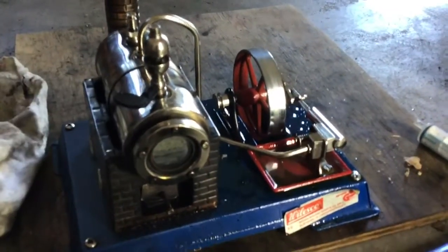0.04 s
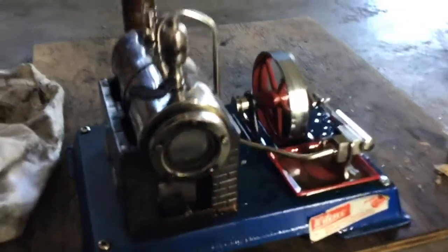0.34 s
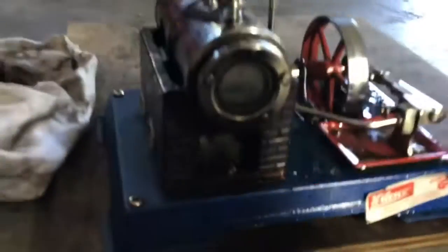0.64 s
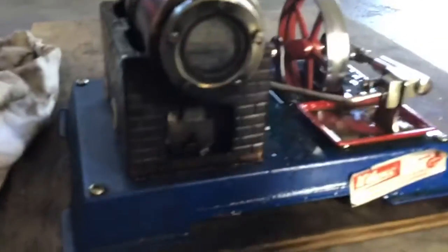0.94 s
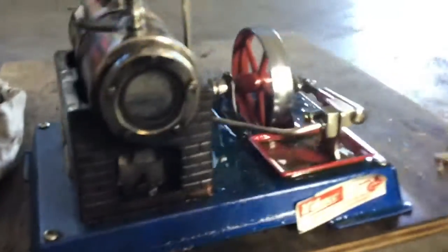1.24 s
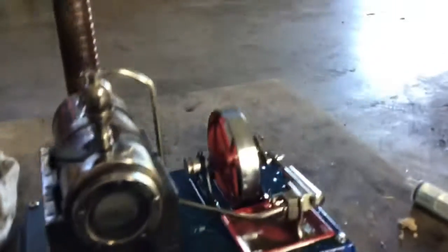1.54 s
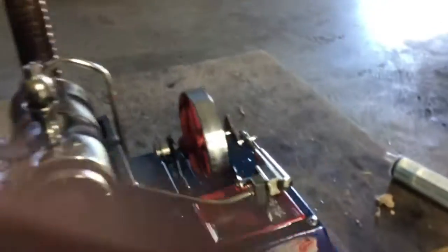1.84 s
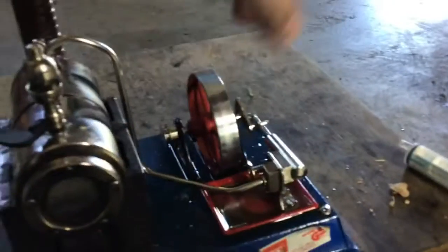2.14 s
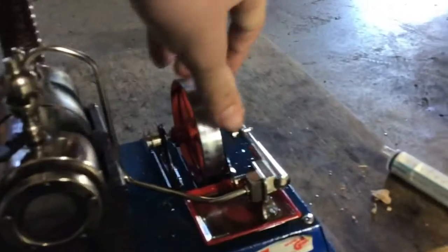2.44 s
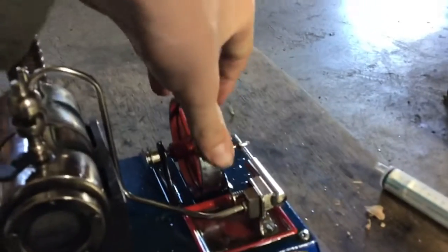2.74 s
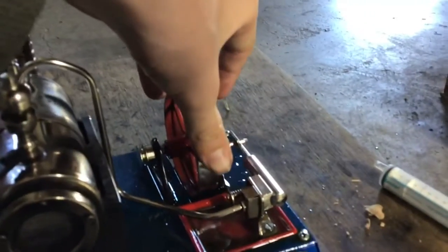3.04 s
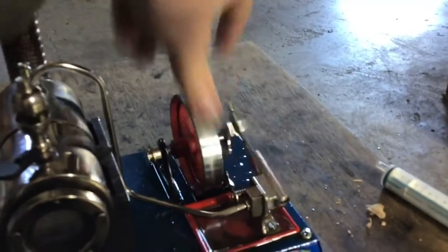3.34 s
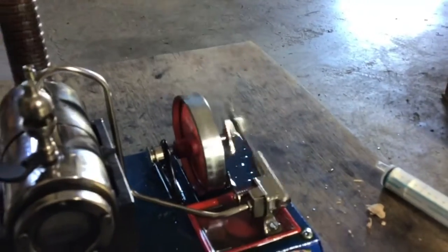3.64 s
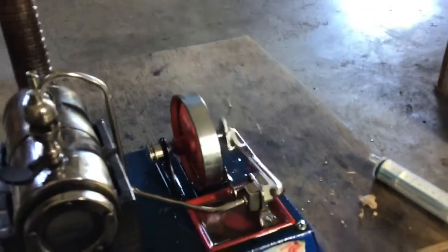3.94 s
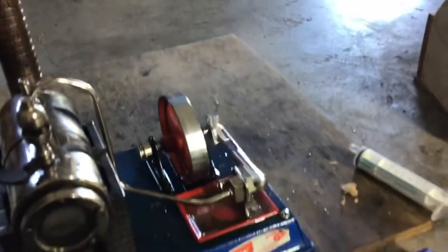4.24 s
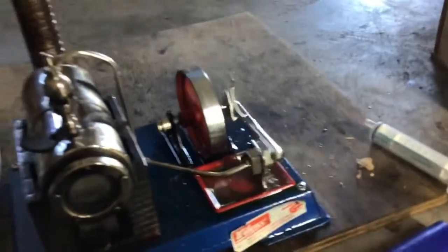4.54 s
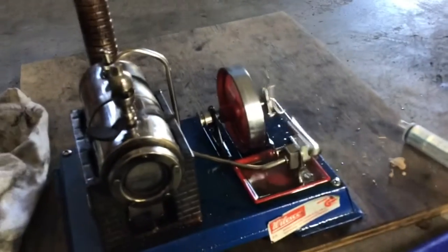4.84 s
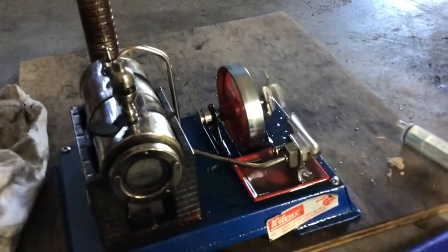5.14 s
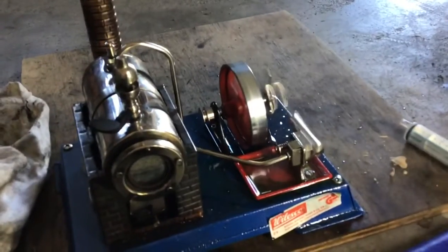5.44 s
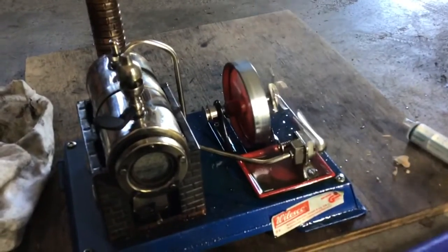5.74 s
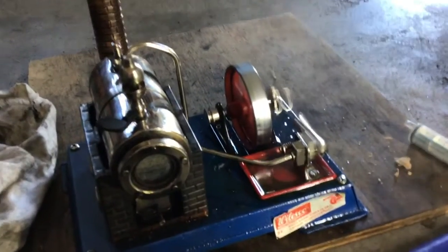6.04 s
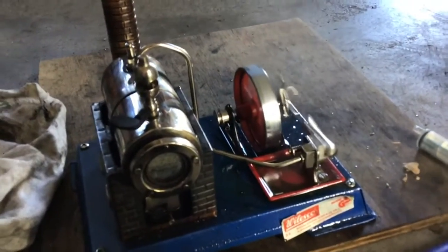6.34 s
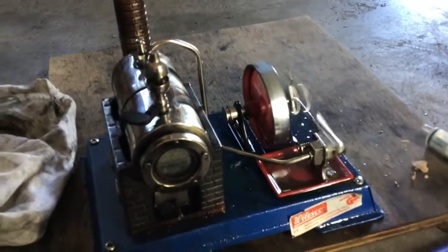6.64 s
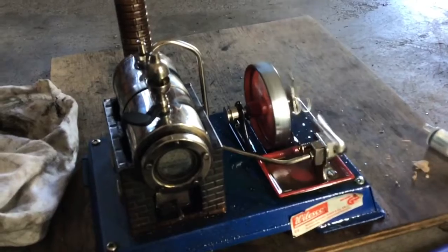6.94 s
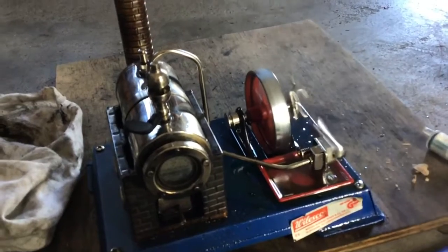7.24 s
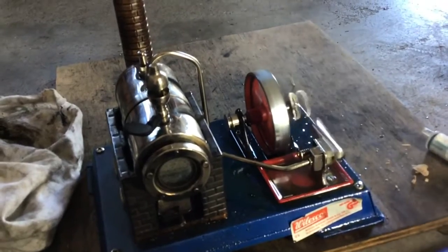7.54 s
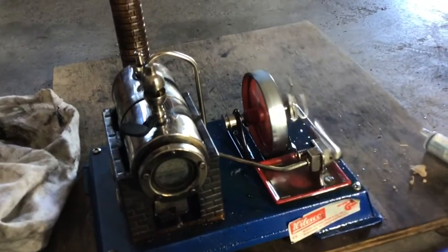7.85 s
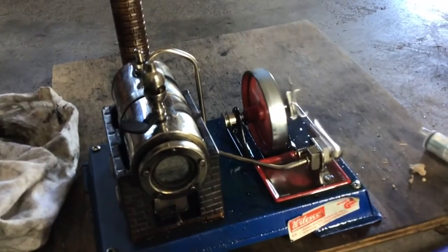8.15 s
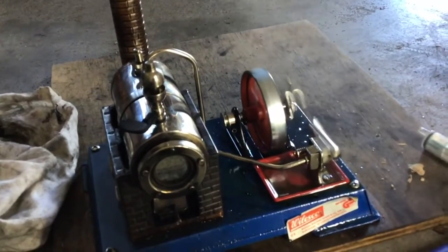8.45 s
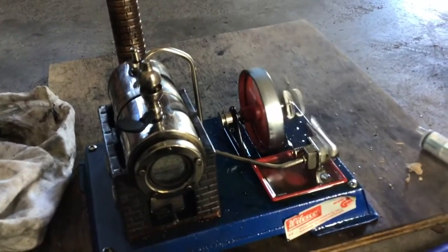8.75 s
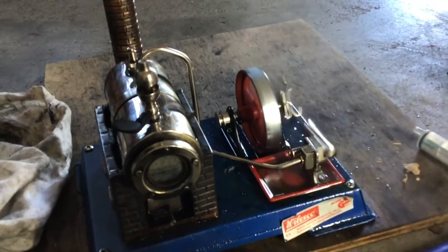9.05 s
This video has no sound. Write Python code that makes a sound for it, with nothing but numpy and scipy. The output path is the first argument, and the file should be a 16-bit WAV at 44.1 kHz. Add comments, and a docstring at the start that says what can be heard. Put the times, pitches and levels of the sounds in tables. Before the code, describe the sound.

A small steam engine hisses faintly amid microphone bumps, then starts with a few clanks and speeds up into rapid chuffing and tinny rattling.

```python
"""Toy steam engine on a workbench

Steam hisses and spits past the piston while a hand shifts a camera, bumping and rubbing its case.
The flywheel is pushed and the engine runs up to 32 turns a second, squeaking on the way.
On every turn the slack crank knocks the tin base plate, the swinging masses make it hum,
and the cylinder lets out two puffs of steam."""
import sys
import numpy as np
from scipy import signal
from scipy.fft import rfft, irfft, next_fast_len
from scipy.io import wavfile
from scipy.ndimage import uniform_filter1d, map_coordinates

SR = 44100
rng = np.random.default_rng(int(sys.argv[2]) if len(sys.argv) > 2 else 0)


def wav_out(sig):
    """Save sig, one row per channel (or a flat mono array), as 16-bit PCM at SR to the path in sys.argv[1]."""
    wavfile.write(sys.argv[1], SR, np.round(np.clip(np.atleast_2d(sig).T, -1, 1) * 32767).astype(np.int16))


N = 400428
TIME = np.arange(N) / SR


def amp(db):
    """Decibels to gain."""
    return 10 ** (np.asarray(db) / 20)


def unit(x):
    """Scale to rms 1."""
    return x / np.sqrt(np.mean(x ** 2) + 1e-20)


def along(points, hz):
    """Read a curve of (Hz, value) points on a log frequency axis."""
    freqs, values = np.transpose(points)
    return np.interp(np.log(hz + 1), np.log(freqs + 1), values)


def curves(rows):
    """One envelope for each column after the time."""
    times, *columns = np.transpose(rows)
    return [np.interp(TIME, times, column) for column in columns]


def wobble(rate):
    """A smooth random curve, rate knots a second."""
    return map_coordinates(rng.standard_normal(int(N * rate / SR) + 4), [TIME * rate])


def swell(start, end, rise, fall):
    """A smooth attack, a hold and a release, all in seconds."""
    ramp = np.clip(np.minimum((TIME - start) / rise, (end - TIME) / fall), 0, 1)
    return np.sin(np.pi / 2 * ramp) ** 2


def filtered(x, response):
    """Apply a gain that depends on frequency."""
    size = next_fast_len(N + SR // 2)
    return irfft(rfft(x, size) * response(np.fft.rfftfreq(size, 1 / SR)), size)[:N]


def low_cut(x, edge_hz):
    """Roll off the lows at 18 dB an octave."""
    return filtered(x, lambda hz: hz ** 3 / np.hypot(hz ** 3, edge_hz ** 3))


def eq(x, spectrum):
    """Colour x with a curve of (Hz, dB) points."""
    return filtered(x, lambda hz: amp(along(spectrum, hz)))


def noise(spectrum):
    """Noise of rms 1, coloured by (Hz, dB) points."""
    return unit(eq(rng.standard_normal(N), spectrum))


def ring(x, modes):
    """Play x through a body of damped modes whose response has unit energy."""
    t = np.arange(SR // 5) / SR
    body = sum((-1) ** k * amp(db) * width * np.exp(-np.pi * width * t) * np.sin(2 * np.pi * hz * t)
               for k, (hz, width, db) in enumerate(modes))
    return signal.fftconvolve(x, body / np.linalg.norm(body))[:N]


def add(track, start, sound):
    """Mix a sound in at a start time in seconds."""
    part = track[round(start * SR):][:len(sound)]
    part += sound[:len(part)]


def chirp(hz, growth, t60, rise_cycles=2.15):
    """A dying note that falls in pitch as its period grows steadily."""
    t = np.arange(SR // 4) / SR
    cycles = np.log1p(growth * hz * t) / growth
    attack = 1 - np.exp(-(t * hz / rise_cycles) ** 2)
    return amp(-60 * t / t60) * attack * np.sin(2 * np.pi * cycles)


# The room's decay. Each row: frequency in Hz, t60 in seconds.
ROOM_DECAY = [(100, 0.51), (1000, 0.25), (4000, 0.22), (14000, 0.36)]

def surroundings(x):
    """Bench and walls answer with a short, dense tail, 2 ms late."""
    hz, t, spectra = signal.stft(rng.standard_normal(SR // 3), SR, nperseg=256)
    tail = signal.istft(spectra * amp(-60 * t / along(ROOM_DECAY, hz)[:, None]), SR, nperseg=256)[1]
    return signal.fftconvolve(x, np.pad(tail, (SR // 500, 0)) / np.linalg.norm(tail))[:N]


# The sleeve's bright swish. Each row: frequency in Hz, relative level in dB.
SWISH_EQ = [(2000, -25), (4300, -11), (5400, 7), (6400, -4), (8000, -20), (15000, -35)]
SWING_END_S = 1.824

def sleeve(swing):
    """Cloth rustles louder as the camera swings round, and swishes near the end."""
    cloth = noise([(500, -5), (1500, 16), (3000, 5), (5500, 6), (8000, -2), (15000, -21.5)])
    time_left = np.maximum(SWING_END_S - TIME, 0)
    rustle = swing * amp(-55 - 16 * time_left + 2 * wobble(rate=25)) * cloth
    swish = amp(-58.5) * swell(1.44, 1.74, rise=.22, fall=.1618) * noise(SWISH_EQ)
    return rustle + swish


# Bumps on the case. Each row: start in seconds, level in dB, first pitch in Hz,
# growth of the period in seconds per second, t60 in seconds.
CASE_BUMPS = [(0.477, -0.5, 1510, 0.49, 0.086), (.844, -23, 1530, 0.36, 0.073),
              (1.162, -32.5, 936, 0.2326, 0.06), (1.198, -24, 520, 0.4424, 0.05594),
              (1.245, -23, 480, 0.31, .05), (1.258, -19, 700, 0.29, 0.028),
              (1.274, -23.5, 1050, 0.18244, 0.0578), (1.477, -12.5, 966.3, 0.372, 0.082),
              (1.7, -23, 905, 0.59, 0.1007), (1.742, -20, 1140, 0.52, 0.11), (2.022, -27, 200, 0.32, 0.14),
              (3.919, -20, 427, 0.225, .09), (3.931, 3.5, 161, 0.27, 0.11),
              (3.964, -7.5, 215, 0.055, 0.079), (4.39, -15.5, 328, 0.42, 0.094)]

def case_bumps():
    """Bumps bend the case, whose high notes arrive first; gives the notes and a skin-scuff envelope."""
    notes, scuff = np.zeros((2, N))
    t = np.arange(SR // 10) / SR
    for start, db, hz, growth, t60 in CASE_BUMPS:
        edge = amp(-18) * chirp(1.8 * hz, growth=.112, t60=.014)
        add(notes, start, amp(db) * (chirp(hz, growth, t60) + edge))
        add(scuff, start, amp(db - 25.5 - 60 * t / .07))
    return notes, scuff


# Skin dragging over the case. Each row: start and length in seconds, then rumble, rub and scratch in dB.
SKIN_DRAGS = [(0.262, 0.18, -71, -75, -84), (0.436, 0.048, -29.5, -33.5, -63),
              (0.577, 0.026, -49, -51, -52), (0.84, .02, -62, -44, -54), (0.957, 0.15, -67, -58, -71),
              (1.266, 0.0455, -45, -42.5, -55), (1.323, 0.043, -54, -46.5, -57),
              (1.727, 0.0466, -31.5, -45.5, -45), (1.739, 0.22, -49, -77, -70),
              (2.087, 0.1, -50.5, -59, -61), (2.209, 0.32, -42, -52, -72), (2.508, 0.19, -41.5, -54, -74),
              (2.67, 0.38, -44.5, -57, -74), (3.947, 0.19, -30, -45.5, -67), (4.226, 0.061, -36, -41, -70),
              (4.275, 0.12183, -35, -35.5, -70), (3.276, .08, -58, -67, -75.5),
              (6.37, 0.104, -49, -46, -73)]
# The resting hand. Each row: time in seconds, rumble level in dB.
RESTING_HAND = [(0, -70), (.5, -55.5), (3.1, -59), (4.8, -51), (5.2, -66.5)]
# The hand's deep rumble and dull rub. Each row: frequency in Hz, relative level in dB.
RUMBLE_EQ = [(20, -24), (45, -32), (70, -1.5), (110, 2), (180, -7), (300, -25.5), (700, -46.5)]
RUB_EQ = [(80, -9), (200, 5.5), (400, 3), (750, -7), (1200, -19), (2500, -27.5), (6000, -55)]

def handling():
    """A hand holds, bumps and swings the camera; its skin rumbles, rubs and scratches on the case."""
    bumps, rubbing = case_bumps()
    rumbling, scratching = np.zeros((2, N))
    for start, length, rumble_db, rub_db, scratch_db in SKIN_DRAGS:
        # long drags are all swell and fade; short ones start more abruptly
        contact = signal.windows.tukey(round(length * SR), min(length / .28, 1))
        add(rumbling, start, amp(rumble_db) * contact)
        add(rubbing, start, amp(rub_db) * contact)
        add(scratching, start, amp(scratch_db) * contact)
    swing = swell(.83, SWING_END_S, rise=.76, fall=.07) * amp(1.56 * wobble(rate=13.2))
    resting = amp(curves(RESTING_HAND)[0])
    grip = amp(1.8 * wobble(rate=24))
    rumble = (resting + amp(-54) * swing + grip * rumbling) * noise(RUMBLE_EQ)
    rub = (amp(-7.5) * resting + amp(-47) * swing + grip * rubbing) * noise(RUB_EQ)
    rustle = sleeve(swing)
    scratch = scratching * noise([(300, 0), (1500, 4), (4000, -6), (10000, -9.5), (16000, -22)])
    return bumps + rumble + rub + rustle + scratch


# The leak's fader moves. Each row: time in seconds, relative levels of the jet and the hiss in dB.
LEAK_LEVELS = [(0.0, -67.5, -74.5), (0.42, -70, -74.5), (0.54, -74.5, -66.5), (0.9, -74, -69),
               (1.06, -73, -64), (1.57, -63.5, -67), (1.84, -64.5, -70), (2.02, -59.5, -66.5),
               (2.2, -64, -66.5), (2.36, -66, -64), (2.5, -61, -68), (2.58, -55.5, -62),
               (2.78, -58.5, -60.5), (3.33, -54, -63)]
# The thin jet and the breathy hiss. Each row: frequency in Hz, relative level in dB.
JET_EQ = [(6000, -31), (7700, -11), (8150, -17), (8900, -4.5), (9500, -4.5), (9950, -2), (10400, -4),
          (11000, -19), (15700, -38)]
HISS_EQ = [(600, -7.5), (1400, -1.5), (2100, -4.5), (2630, 3), (2900, -2), (3180, 5.5), (3440, -5),
           (3700, 2), (4100, -6), (4750, -2), (6000, -9), (7500, -7), (16000, -29.5)]

def leak(turns, running_db=-22.5):
    """Steam escapes past the piston, nearly whistles for a moment, and drops once the wheel turns."""
    jet_db, hiss_db = np.array(curves(LEAK_LEVELS)) + running_db * np.clip(turns, 0, 1)
    whistle_start = 2.52
    whistle_hz = 9800 + 100 * (TIME - whistle_start) + 89.5 * wobble(rate=11)
    roughness = noise([(20, 3), (130, 2), (350, -17), (1200, -64.5)])
    whistle = np.sin(2 * np.pi * np.cumsum(whistle_hz) / SR) * roughness
    whistle *= amp(-59) * swell(whistle_start, 2.7, rise=.066, fall=.12)
    flutter = amp(1.2 * wobble(rate=10) + 1.4 * wobble(rate=90))
    # reading the noise at an uneven rate makes its pitch wander
    jet = map_coordinates(noise(JET_EQ), [np.cumsum(1 + .012 * wobble(rate=9))], mode="reflect")
    hiss = amp(hiss_db + 1 + 1.3 * wobble(rate=19)) * noise(HISS_EQ)
    return flutter * (amp(jet_db + .5) * jet + whistle) + hiss


# Drops spitting at the leak. Each row: start in seconds, level in dB.
WATER_SPITS = [(1.089, -57), (1.116, -54), (1.146, -54), (2.242, -52), (2.273, -52), (2.368, -53),
               (2.418, -53)]
# Their tone. Each row: frequency in Hz, relative level in dB.
SPIT_EQ = [(1500, -22), (3300, 1), (6000, -2.5), (8000, -14), (15000, -24)]

def spits(t60=.025):
    """Condensed water sputters out with the steam."""
    bursts, t = np.zeros(N), np.arange(SR // 20) / SR
    for start, db in WATER_SPITS:
        add(bursts, start, amp(db - 60 * t / t60))
    return bursts * noise(SPIT_EQ)


# Small clicks of the linkage. Each row: start in seconds, relative level in dB.
FINGER_TICKS = [(0.378, -50), (2.134, -47), (2.351, -47), (2.79, -47.5), (3.181, -49), (3.251, -43.5),
                (3.292, -44.5)]
# Clanks of the crank. Each row: start in seconds, send to the rod in dB, send to the bench in dB.
CRANK_CLANKS = [(3.368, -30, -48), (3.398, -53.5, -42.5), (3.464, -29.5, -47.5), (3.59, -50, -27.5)]

def fingers(tick_t60=.025, clank_t60=.048):
    """The linkage clicks under the fingers; the crank clanks on release and on its first strokes."""
    taps, on_rod, on_bench = np.zeros((3, N))
    t = np.arange(SR // 30) / SR
    for start, db in FINGER_TICKS:
        add(taps, start, amp(db - 60 * t / tick_t60) * rng.standard_normal(len(t)))
    for start, rod_db, bench_db in CRANK_CLANKS:
        jolt = amp(-60 * t / clank_t60) * rng.standard_normal(len(t))
        add(on_rod, start, amp(rod_db) * jolt)
        add(on_bench, start, amp(bench_db) * jolt)
    clanks = ring(on_rod, ROD_MODES) + amp(-6) * eq(on_rod, HISS_EQ) + ring(on_bench, THUMP_MODES)
    clicks = amp(-16) * ring(taps, PLATE_MODES) + amp(6.5) * eq(taps, CHUFF_EQ) + amp(-6.5) * taps
    return clanks + clicks


# The run-up, starting at the push. Each row: time in seconds, speed in turns a second.
RUN_UP = [(3.367, 9.525), (3.61, 11.049), (4, 17.689), (4.51, 24.607), (4.7, 25.311), (4.87, 28.087),
          (5.52, 30.646), (5.84, 31.291), (6.39, 31.944), (7.2, 32.374), (9.08, 32.282)]
PUSH_S = RUN_UP[0][0]

def flywheel():
    """Speed, and the turns made since the push; the wheel runs slightly unevenly."""
    speed, = curves(RUN_UP)
    turns = np.cumsum(speed * (TIME > PUSH_S)) / SR
    return speed, turns + .005 * wobble(rate=9) * np.minimum(turns, 1)


# The engine's three paces: slow, medium and full speed, in turns a second.
PACE_SPEEDS = [10.6, 17.9, 33.7]

def by_pace(speed, values):
    """Crossfade between the values for slow, medium and full speed."""
    return np.interp(speed, PACE_SPEEDS, values)


def puff(turns, centre, width, scatter_db):
    """A bell-shaped envelope once a turn, as of a port opening; centre and width are in turns."""
    offset = turns - centre + .5
    sizes = amp(scatter_db * rng.standard_normal(int(turns[-1]) + 3))
    bell = np.exp(-.5 * ((offset % 1 - .5) / width) ** 2)
    return sizes[np.floor(offset).astype(int)] * bell * (turns > 0)


# How readily the base hums along. Each row: frequency in Hz, gain in dB.
BASE_RESPONSE = [(55, -20), (92, -10), (115, -18), (157, -1), (180, -17), (222, -9), (240, -15), (258, -8),
                 (290, -10), (320, -13), (385, -7), (430, -10), (460, -4), (492, -2), (520, 2.5), (545, -8),
                 (605, -15), (655, -9), (675, -2), (700, -14), (742, -3), (773, -2), (810, -4), (838, -2),
                 (868, -11), (938, 0), (1000, -5), (1150, -17), (1470, -10), (1512, -1), (1560, -18)]
# The hum grows with speed. Each row: turns a second, level in dB.
HUM_LEVELS = [(10, -62), (25, -52), (28, -42)]

def base_hum(speed, turns, strongest_at_turn=.28, scatter_radians=1.15):
    """The swinging masses shake the base at multiples of the speed; each swells passing a resonance."""
    hum = np.zeros(N)
    for order in range(2, 50):
        phase = 2 * np.pi * order * (turns - strongest_at_turn) + scatter_radians * rng.standard_normal()
        hum += amp(along(BASE_RESPONSE, order * speed)) * np.cos(phase)
    level_db = np.interp(speed, *np.transpose(HUM_LEVELS)) + .71 * wobble(rate=6)
    return amp(level_db) * hum * (turns > 0)


def piston_squeak(speed, turns, hz=1400):
    """Near 22 turns a second each working stroke draws a short metallic note from the piston."""
    note = np.sin(2 * np.pi * np.cumsum(hz * (1 + .06 * wobble(rate=600))) / SR)
    nearness = np.exp(-((speed - 22.4) / 3.8) ** 2)
    return amp(-18.5) * nearness * puff(turns, .283, .039, scatter_db=0) * note


# The throaty chuff, the bright exhaust and the whistling valve.
# Each row: frequency in Hz, relative level in dB.
CHUFF_EQ = [(200, -13.5), (600, -7.5), (980, 2), (1160, -6.5), (1500, 1), (1840, -7), (2040, -5.5),
            (2480, -12), (3290, -6.5), (3460, -17.5), (3620, -5.5), (3850, -14.5), (4400, -9.5),
            (4850, -13.5), (6930, -20), (9450, -22), (12300, -33), (15700, -27.5)]
EXHAUST_EQ = [(500, -50), (2000, -0.5), (4500, -10.5), (6000, -4), (7000, -4), (8500, 2), (9500, 4),
              (10300, 0), (11200, -8.5), (14000, -9.5), (16000, -25)]
VALVE_EQ = [(2500, -33), (5000, 5.5), (5450, -2), (5950, 1.5), (6800, -11), (8400, -13), (8700, 9),
            (9100, -16), (15000, -28)]
# Faders for the chuff, the valve and the steam-rung rod. Each: dB at slow, medium and full speed.
CHUFF_LEVELS = [-44, -33, -31]
VALVE_LEVELS = [-48, -39, -62]
ROD_PUFF_LEVELS = [-39, -34.5, -37.5]

def steam(speed, turns):
    """Each end of the cylinder exhausts once a turn; the puffs come earlier in the turn at speed."""
    first = puff(turns, by_pace(speed, [.28, .26, .17]), by_pace(speed, [.04, .035, .02]), .5)
    second = puff(turns, by_pace(speed, [.66, .615, .47]), by_pace(speed, [.026, .042, .055]), 2)
    stroke = puff(turns, by_pace(speed, [.28, .29, .255]), by_pace(speed, [.08, .052, .1]), .5)
    # while the wheel is slow, fresh steam has time to blow past the opening valve
    opening = puff(turns, .055, .055, scatter_db=1.5)
    blow = opening * amp(-42 + 3 * (speed - PACE_SPEEDS[0])) * np.clip(16.5 - speed, 0, 1)
    running = turns > 0
    outflow = by_pace(speed, [.9, 1.8, 1.7]) * first + 2.4 * second + .1 * running
    exhaust = amp(-44.5) * outflow * noise(EXHAUST_EQ)
    wet_sputter = amp(unit(uniform_filter1d(rng.standard_normal(N), size=50)))
    steady_flow = by_pace(speed, [.25, .24, .47]) * running
    flow = amp(by_pace(speed, CHUFF_LEVELS)) * (stroke + steady_flow) + .5 * blow
    # the early blow and the working stroke also set the rod ringing
    on_rod = blow + amp(by_pace(speed, ROD_PUFF_LEVELS)) * puff(turns, .3078, .05444, scatter_db=3)
    through_valve = opening * by_pace(speed, [1, .5, .3]) + stroke
    valve = amp(by_pace(speed, VALVE_LEVELS)) * through_valve * noise(VALVE_EQ)
    chuff = flow * wet_sputter * noise(CHUFF_EQ)
    rod = on_rod * unit(ring(rng.standard_normal(N), ROD_MODES))
    return exhaust + valve + chuff + rod


# The knocks of one turn. Each row: crank position in turns, relative level in dB at slow, medium
# and full speed, then sends in dB to the plate, the rod and the bench.
SLACK_KNOCKS = [(.015, -10, -23, -7.5, -3.5, 10.5, -42), (.135, -14, -23, -5.5, -2, 3, 4),
                (.25, -5.5, -4.5, -0.5, 1.5, 0, -4), (.28, -11.5, -16.5, -2.5, -1, -2.5, -1.5),
                (.39, -14.5, -11.5, -7, -1.5, 9, -21), (0.861, -22, -33, -9, 0.5, 6, -8.5)]

def knocks(speed, turns, scatter_s, scatter_db=1.8):
    """Impulses into plate, rod and bench as the crank takes up its slack, uneven in time and force."""
    tracks, whole_turns = np.zeros((3, N)), np.arange(int(turns[-1]))
    for position, slow, medium, full, *sends_db in SLACK_KNOCKS:
        late, hard = rng.standard_normal((2, len(whole_turns)))
        on_time = np.searchsorted(turns, whole_turns + position)
        at = np.clip(on_time + (late * scatter_s * SR).astype(int), 0, N - 1)
        level_db = by_pace(speed[at], [slow, medium, full]) + scatter_db * hard
        size = amp(level_db) * np.sqrt(SR / speed[at])  # a faster rate alone adds no power
        tracks[:, at] += np.outer(amp(sends_db), size)
    return tracks


# Resonances of the base plate with its boiler, of the crank and rod, and of the base on the bench.
# Each row: frequency in Hz, bandwidth in Hz, relative level in dB.
PLATE_MODES = [(245, 67, -2.5), (441, 99, 3), (547, 29, 6), (661.15, 19, -2.5), (710, 28, -6),
               (774.8, 42, -0.5), (852, 59, -5), (930, 136, -4.5), (1210, 830, -9.5), (1314, 180, -10.5),
               (1463, 50, -8.5), (1511, 28.63, 3), (1680, 53, -18), (1980, 25, -8), (2910, 78.36, -8),
               (3287, 230, -9), (3630, 150, -7), (4070, 99.2, -11), (4390, 82, -10)]
ROD_MODES = [(463, 69, -0.5), (824, 48, 5), (950, 55, 6.5), (1295, 150.5, 7.5), (1438, 74, 8),
             (1515, 46, 4), (1760, 40, 8.5), (3250, 140, -12), (4850, 210, -15)]
THUMP_MODES = [(520, 230, -5), (834, 410, -1)]
# Fader for the thump on the bench: dB at slow, medium and full speed.
THUMP_LEVELS = [2, -6, -4]

def linkage(speed, turns, soft_start_db=-15.5, firm_up_s=.14):
    """Knocks drum the plate, thump the bench and ring the rod; loose parts rattle most at full speed."""
    since_push = np.maximum(TIME - PUSH_S, 0)
    force = amp(-37 + soft_start_db * np.exp(-since_push / firm_up_s))
    on_plate, on_rod, on_bench = force * knocks(speed, turns, scatter_s=.00008)
    loose = force * knocks(speed, turns, scatter_s=.0004)[0]
    plate = low_cut(ring(on_plate * amp(by_pace(speed, [0, -6, -8])), PLATE_MODES), edge_hz=140)
    thump = low_cut(ring(on_bench * amp(by_pace(speed, THUMP_LEVELS)), THUMP_MODES), edge_hz=350)
    # the light loose parts hardly move the low modes
    rattle = low_cut(ring(loose * amp(by_pace(speed, [-9, -11, -3])), PLATE_MODES), edge_hz=1070)
    rod = ring(on_rod * amp(by_pace(speed, [-8, -2.5, -12])), ROD_MODES)
    metal_snap = unit(eq(loose, CHUFF_EQ)) * amp(by_pace(speed, [-48, -47, -49]))
    return plate + thump + rattle + rod + metal_snap


def scene():
    """The engine with a little room on it; leak, spits, fingers and handling stay dry."""
    speed, turns = flywheel()
    engine = sum(source(speed, turns) for source in (linkage, base_hum, piston_squeak, steam))
    room = amp(-8) * surroundings(engine)
    return (engine + room + leak(turns) + spits() + fingers() + handling())[None]


def record(dry):
    """The microphone drops the deepest bass and everything above its band limit."""
    low_hz, top_hz = 52, 15830
    return filtered(dry[0], lambda hz: (hz < top_hz) * hz ** 3 / np.hypot(hz ** 3, low_hz ** 3))[None]


dry = scene()
out = record(dry)
wav_out(out)
```